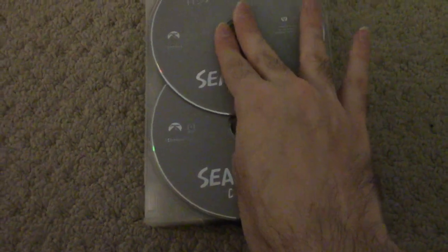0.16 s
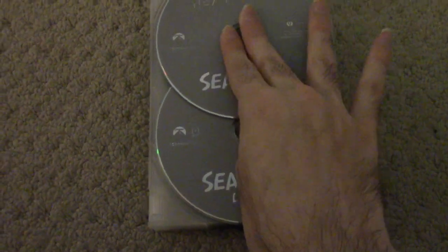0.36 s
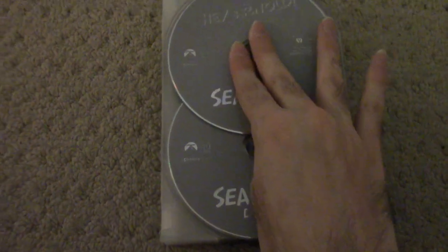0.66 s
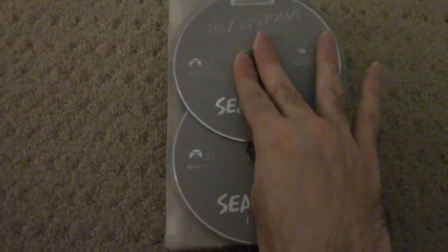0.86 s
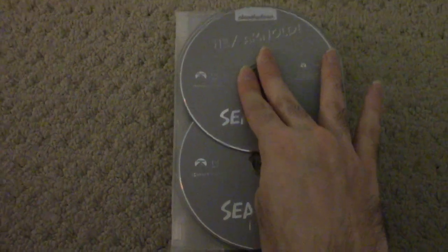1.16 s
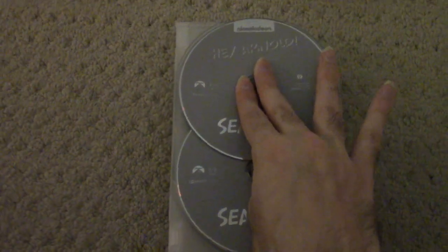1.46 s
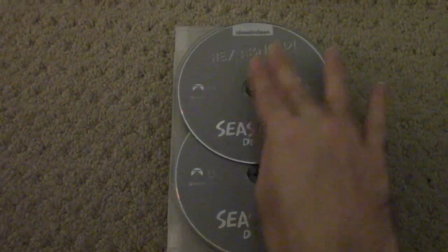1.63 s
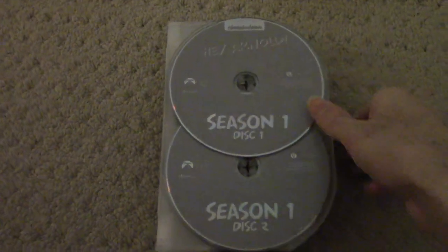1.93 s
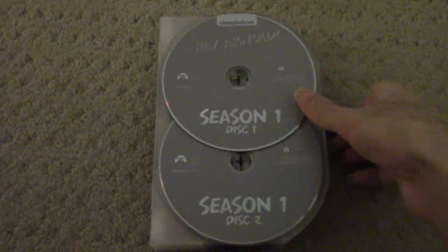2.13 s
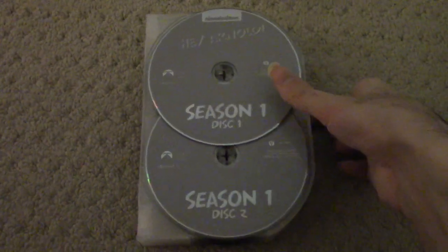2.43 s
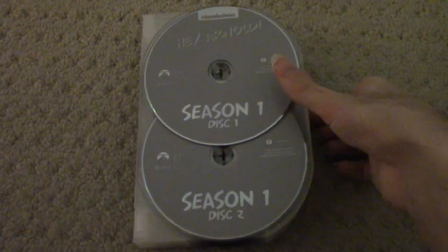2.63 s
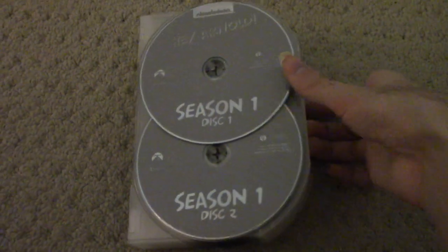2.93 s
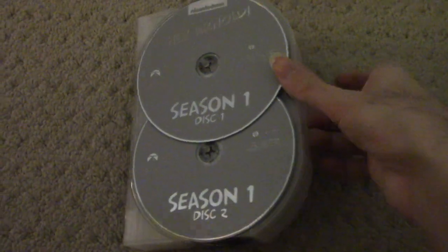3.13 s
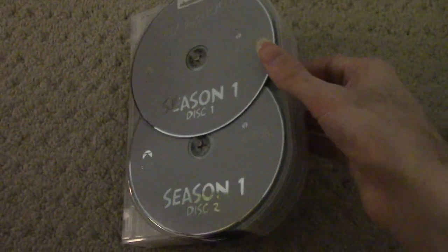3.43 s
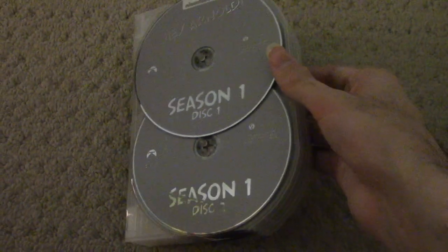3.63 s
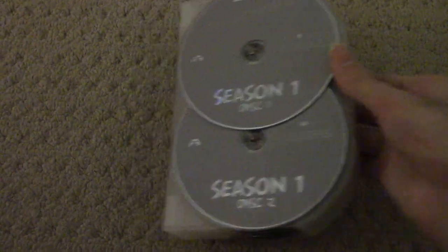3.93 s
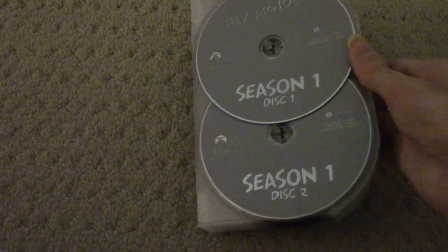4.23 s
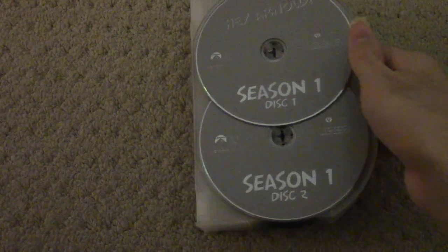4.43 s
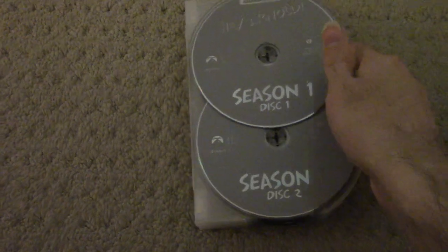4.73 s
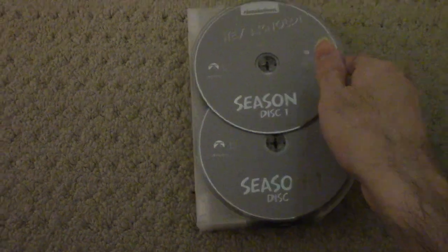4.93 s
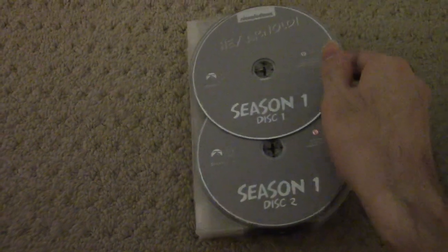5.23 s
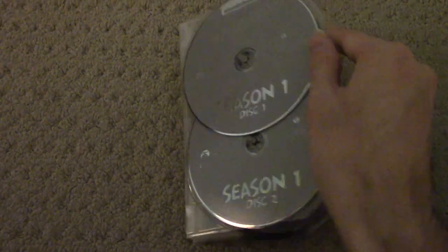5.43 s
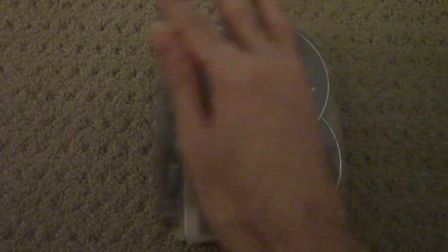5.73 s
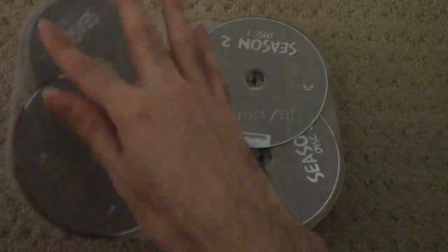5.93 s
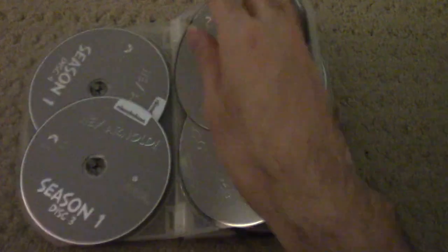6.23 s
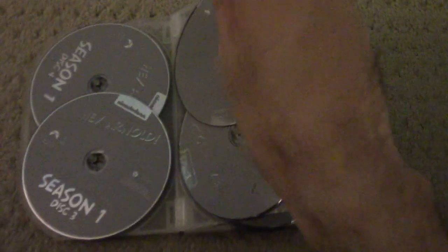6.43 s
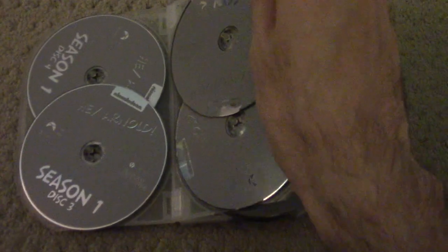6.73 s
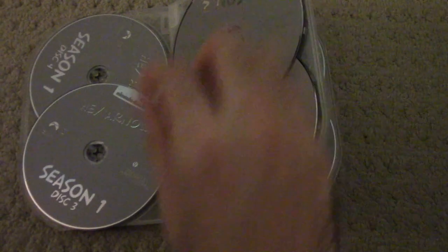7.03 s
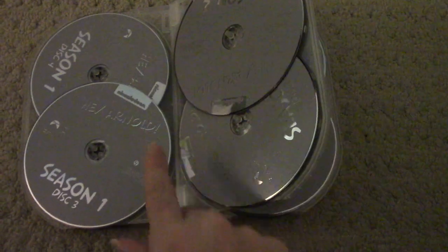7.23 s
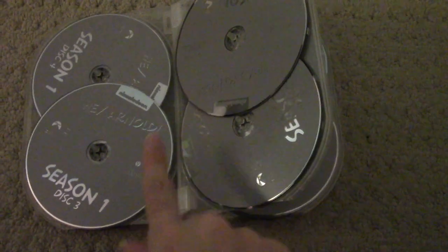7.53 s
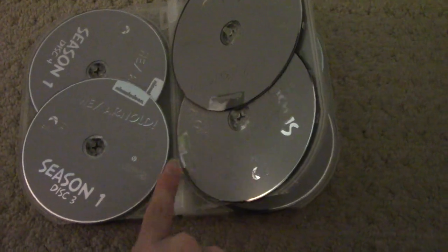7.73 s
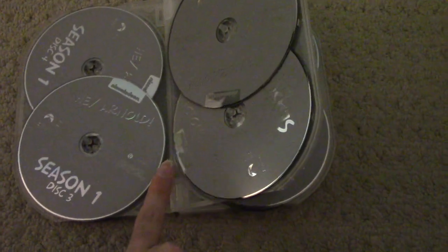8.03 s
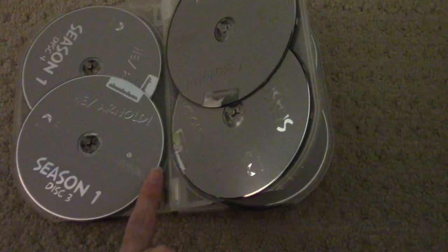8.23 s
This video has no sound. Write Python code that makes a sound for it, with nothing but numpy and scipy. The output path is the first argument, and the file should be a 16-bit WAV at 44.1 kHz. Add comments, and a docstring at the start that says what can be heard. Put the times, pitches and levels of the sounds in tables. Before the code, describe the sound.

Fingers pry at discs in a plastic case, with sharp clicks, a ripping catch and a rattling slap as the tray flips over.

```python
"""A plastic case full of discs is opened by hand on the carpet of a small, quiet room.
After a few clicks a disc snaps onto its hub. Fingers pry and tick along the rim, skin scuffs the
plastic, the case rocks and the hub creaks. The catch sticks, slips and rips free; then a loaded tray
swings over, slaps down and rattles, and a loose disc settles. Last comes the soft swish of an arm
drawing back, over low room tone with faint whines and chirps."""
import sys
import numpy as np
from scipy import signal
from scipy.fft import rfft, irfft, next_fast_len
from scipy.io import wavfile

SR = 44100
rng = np.random.default_rng(int(sys.argv[2]) if len(sys.argv) > 2 else 0)


def store_wav(level_fs):
    """Save 16-bit WAV to argv[1]."""
    pcm = np.round(np.clip(np.atleast_2d(level_fs), -1, 1) * 32767)
    wavfile.write(sys.argv[1], SR, pcm.T.astype(np.int16))


N = 369116
HANDLING_S = (1.2, 6.1)   # the hand works on the case: start, end
T_SHORT, T_LONG = np.arange(2600) / SR, np.arange(13000) / SR
EDGES_HZ = np.geomspace(62, 17000, 25)
CENTRES_HZ = np.sqrt(EDGES_HZ[1:] * EDGES_HZ[:-1])
BANK = [signal.butter(2, band, "band", fs=SR, output="sos") for band in zip(EDGES_HZ, EDGES_HZ[1:])]


def hub_snap():
    """The teeth of the hub jump through the hole of the disc, which cracks and rings."""
    # teeth jumping: t/s, level/dB
    teeth = [(1.2028, 6.5), (1.2041, 6.5), (1.2058, 3.5), (1.2082, -2)]
    # EQ of a contact on the disc: f/Hz, level/dB
    colour = [(70, -32), (140, -25), (220, -2), (300, -7), (560, 1), (1050, -3), (1400, -5), (2800, 2.5),
              (4000, 0), (5200, -6), (8300, 1), (9900, 0), (12000, -8.5), (15000, -21)]
    # disc resonances: f/Hz, width/Hz, level/dB
    modes = [(244.5, 45, -6), (398.5, 60, -7.5), (509.5, 40, -2.5), (663.5, 29, 1), (790, 55, -3),
             (940, 50, -4.5), (1057.3, 50, -2), (1568.5, 60, 2), (2026, 28, -2.5), (2347, 40, -4.5),
             (2793, 33, -1.5), (3030, 32, -3), (3400, 40, -4), (3822, 48, -3.5), (4100.8, 60, 3.5),
             (4460, 54, -4), (4939.2, 36, -7.5), (5460, 58, -6.5), (5780, 45, -8), (6200, 30, -6.5),
             (6540, 41, -2), (7920, 47, 0.5), (8050, 80, 1), (8760, 45, -4.5), (8900, 70, -1),
             (10200, 90, -6), (11030, 98, -13.5), (11470, 120, -10)]
    attack = struck(teeth, colour, crack_t60=.01, buzz_db=-12, buzz_t60=.11, rise_s=.00006)
    ring = ringing(teeth, modes, held_t60=.02, free_db=-9)
    return from_db(-1.47) * attack + from_db(-4) * ring


def catch_rip(release_s=4.7928, last_gap_s=.0026):
    """The catch sticks and slips, faster and harder until it lets go, then springs back once."""
    # EQ of a contact on the catch: f/Hz, level/dB
    colour = [(70, -35.5), (160, -10), (250, -3), (300, -7), (400, 0), (580, -10), (1100, 0), (1600, 1.5),
              (2800, 3), (5000, -3.5), (9500, -4), (12000, -16), (15000, -29.5)]
    # catch resonances: f/Hz, width/Hz, level/dB
    modes = [(246, 38, -8.5), (386.4, 60, -9), (1499, 51, 1), (1618.8, 60, -0.5), (1875.1, 70, 1),
             (2010, 80, 0), (2500, 60, -5), (2840, 55, -1), (2871.6, 60, -2), (3500, 70, -11),
             (3780, 70, -9), (7676.6, 100, -5)]
    ahead_s = np.append(0, np.cumsum(last_gap_s * 1.095 ** np.arange(9)))
    slip_db = -1 - 30 * (ahead_s / ahead_s[-1]) ** 2.15
    spring_back = (release_s + .033, -22)
    slips = [*zip(release_s - ahead_s, slip_db), spring_back]
    attack = struck(slips, colour, crack_t60=.015, buzz_db=-11, buzz_t60=.031, rise_s=.0007)
    ring = ringing(slips, modes, held_t60=.013, free_db=-12)
    return from_db(-2) * attack + from_db(-6.5) * ring


def tray_slap():
    """The loaded tray slaps down, buzzing and ringing as its discs rattle to rest."""
    # EQ of a contact on the tray: f/Hz, level/dB
    colour = [(70, -18), (130, -13), (300, 0), (520, -4.5), (700, 1.5), (1000, 1), (2000, -1), (3200, 0),
              (5000, -12.5), (7500, -2), (9700, -5.5), (11500, -18), (15000, -28)]
    # tray resonances: f/Hz, width/Hz, level/dB
    modes = [(428, 24, 3.5), (800, 10.5, 4), (940, 13, -9), (1300, 20, -4), (1417, 33, -2),
             (1507, 18, -7.5), (1815, 57.4, -1), (2166, 62.2, -5), (2530, 32.3, -8.5), (2800, 27, -8),
             (2940, 23.23, -3), (3160, 23.8, -4), (3595.7, 55, -6)]
    hits = tray_rattle() + disc_settling()
    attack = struck(hits, colour, crack_t60=.015, buzz_db=-3, buzz_t60=.025, rise_s=.00018)
    ring = ringing(hits, modes, held_t60=.02, free_db=2)
    return from_db(-1.5) * attack + from_db(-10) * ring


def tray_rattle(gap_s=.0046, drop_db=4.5, fade_db_per_s=330):
    """Each landing sets off a quick, uneven, fading rattle: t/s, level/dB."""
    # the tray and its discs land: t/s, level/dB, rattle length/s
    landings = [(6.1625, -16.5, .002), (6.1704, 0.5, .02), (6.195, -5.5, .038), (6.406, -27.5, .012),
                (6.4198, -18.5, .007), (6.474, -39, .018)]
    hits = []
    for s, db, length in landings:
        after = np.cumsum(gap_s * np.exp(.08 * rng.standard_normal(12)))
        hits.append((s, db))
        hits += [(s + t, db - drop_db - fade_db_per_s * t) for t in after[after < length]]
    return hits


def disc_settling(start_s=6.262, first_gap_s=.029, slowing=1.35, loss_db=3):
    """A loose disc rocks to rest, tapping the tray ever slower and softer: t/s, level/dB."""
    after = np.append(0, np.cumsum(first_gap_s * slowing ** np.arange(3)))
    return [(start_s + t, -26 - loss_db * k) for k, t in enumerate(after)]


def case_clicks(rim_hz=1780):
    """Nails and disc edges tick on the case; prying also rings its rim, which the grip damps."""
    # foreground clicks: t/s, level/dB, low shelf/dB, high shelf/dB
    clicks = [(0.2762, -19.5, -17, -10.5), (1.0748, -4, -1.5, -12), (1.1942, -16, 5.5, -15),
              (1.8687, -20.5, -1.5, -5.5), (1.9127, -21.5, 1, -9.5), (1.9418, -29, -10, -8),
              (2.044, -8.5, 8, -4), (2.4834, -26.5, 5.5, -12), (2.5025, -20, -4, -7),
              (2.6227, -11.5, 10, -8), (2.646, -25, 4, 2.5), (2.7466, -29.5, 8, -6),
              (2.7699, -11.5, -5, -11.5), (2.9518, -30, 4.5, -4), (3.0392, -23.5, 14.5, -8.5),
              (3.1972, -24.5, -19.5, -1.5), (3.246, -19, 3, -5), (3.2655, -14, -5, -7.5),
              (3.2863, -28, 1.5, -6), (3.669, -27, -6, -5), (3.7637, -20, -8, -18.5),
              (4.1992, -23, 5.5, -11), (5.206, -26, 5.5, -3), (5.9253, -22.5, 9, -10.5),
              (5.973, -29, 6, -10), (6.0856, -31, 10.5, -5.5), (8.062, -35, 5, -1.5)]
    # EQ of a click: f/Hz, level/dB
    colour = [(70, -20), (140, -0.5), (260, 2), (450, -4.5), (1000, 1), (1400, -6), (2500, 2), (4500, -1.5),
              (6000, 0.5), (9000, 3), (11500, -16), (15000, -17.5)]
    # rim ring relative to its click, freest while the thumb pries: t/s, level/dB
    rim_freedom = [(1.95, -17), (2.02, 3.5), (2.5, -3), (2.8, -4), (2.9, -15)]
    rim = unit(np.sin(2 * np.pi * rim_hz * T_SHORT) * dying(T_SHORT, t60=.011))
    out = np.zeros(N)
    for s, db, body_db, edge_db in clicks + hub_creaks() + faint_ticks():
        shelves = at_hz([(900, body_db), (2600, 0), (3400, .0019), (6500, edge_db)], CENTRES_HZ)
        add(out, s, plastic_crack(db + .97 + shelves + at_hz(colour, CENTRES_HZ)))
        rim_db = db + np.interp(s, *np.transpose(rim_freedom))
        add(out, s, from_db(rim_db) * rim)
    return out


def hub_creaks(gap_s=.004, fade_db_per_s=220):
    """The strained hub creaks in quick, uneven, fading slips, listed like the clicks."""
    # creaks: t/s, length/s, level/dB
    creaks = [(2.772, .012, -24.5), (3.241, .014, -25.5), (3.268, .024, -29.5)]
    slips = []
    for s, length, db in creaks:
        after = gap_s * (np.arange(7) + .5 * rng.random(7))
        slips += [(s + t, db - fade_db_per_s * t, -3, -3) for t in after[after < length]]
    return slips


def faint_ticks(per_s=3, spread_db=3.5):
    """Light chance touches of the working hand, listed like the clicks."""
    count = int(per_s * np.ptp(HANDLING_S))
    times = rng.uniform(*HANDLING_S, count)
    offsets_db = rng.uniform(-spread_db, spread_db, (count, 2))
    return [(s, -37 + db, body_db, -4.5) for s, (db, body_db) in zip(times, offsets_db)]


def case_thuds():
    """The case rocks on the carpet with low, dull thuds."""
    # thuds: t/s, level/dB
    thuds = [(1.915, -32), (2.052, -12.5), (2.626, -29.5), (6.178, -17)]
    # low resonances of the case: f/Hz, width/Hz, level/dB
    modes = [(122, 26.6, 1), (164.81, 31.16, 9), (216, 19, 8), (301, 30, -14)]
    return from_db(-6) * ringing(thuds, modes, held_t60=.035, free_db=-1)


def finger_rubs(grain_db=4.5, judder_db=3.5):
    """Skin sticks and slips in tiny uneven steps: a rasp in the shell and a hiss on its surface."""
    # finger strokes: middle t/s, length/s, rasp level/dB, hiss level/dB
    strokes = [(2.78, 0.081, -55.5, -70), (3.264, 0.031, -51, -70), (3.48, .018, -62.5, -69),
               (3.738, 0.059, -57, -81.5), (4.14, 0.059, -65, -87), (4.348, 0.036, -51.5, -53.5),
               (4.469, 0.071, -52.5, -63.5), (4.765, 0.036, -51, -67.5), (5.702, 0.086, -70, -68.5),
               (5.82, 0.036, -68, -60.5), (5.98, 0.053, -58.5, -69), (6.44, .15, -66.5, -85),
               (7.317, 0.13, -78, -70)]
    # EQ of the rasp: f/Hz, level/dB
    rasp_colour = [(400, -34), (650, -20), (820, 2.5), (1100, -10.5), (1400, -8), (1700, 5), (1900, -.5),
                   (2150, -2), (3000, -6.5), (4500, -13), (7000, -22), (15000, -39)]
    # EQ of the hiss: f/Hz, level/dB
    hiss_colour = [(2000, -1.5), (5000, -7), (9000, 3.5), (11500, -6), (15000, -19)]
    grit = rng.standard_normal(N) * from_db(grain_db * np.minimum(rng.exponential(1, N), 5))
    slips = grit * from_db(judder_db * noise_band(centre_hz=0, width_hz=150))
    creeping_grip = (np.mean(HANDLING_S), np.ptp(HANDLING_S) / 2, -74, -82)
    rasp = from_db(-4) * shaped(slips, lambda hz: at_hz(rasp_colour, hz))
    hiss = from_db(-4.5) * shaped(slips, lambda hz: at_hz(hiss_colour, hz))
    return sum(swell(s, length) * (from_db(rasp_db) * rasp + from_db(hiss_db) * hiss)
               for s, length, rasp_db, hiss_db in strokes + [creeping_grip])


def sleeve_swish():
    """A soft swish as the arm draws back."""
    # EQ of the sleeve: f/Hz, level/dB
    colour = [(800, -24), (2400, 4), (4000, 0), (7000, 2), (10000, -3), (15000, -16)]
    return from_db(-64) * swell(middle_s=7.06, length_s=.1486) * noise(colour)


def room(x, wet_db=-16.5, side_db=-20.5, build_s=.0076, t60=.14):
    """Reflections of a small carpeted room build up after the direct sound and die quickly."""
    envelope = dying(T_LONG, t60) * (1 - np.exp(-(T_LONG / build_s) ** 2))
    damping = signal.butter(1, 10970, fs=SR, output="sos")
    tails = signal.sosfilt(damping, rng.standard_normal((2, len(T_LONG))) * envelope)
    mid, side = (signal.fftconvolve(x, unit(tail))[:N] for tail in tails)
    return x + from_db(wet_db) * (mid + from_db(side_db) * side * [[1], [-1]])


def room_tone():
    """A low rush with faint whines and chirps, nearly the same at both ears."""
    # EQ of the rush: f/Hz, level/dB
    colour = [(20, -31), (40, -24.5), (75, -13.5), (120, -5), (170, -3), (240, -4), (433, -10.5),
              (700, -13.5), (1020, -18), (1500, -19), (2000, -22), (4870, -27.5), (9500, -34), (15000, -42)]
    # narrow noise bands that whine: f/Hz, width/Hz, level/dB
    whines = [(170, 17, -74), (248.56, 25, -73), (1575, 45, -82)]
    # extra EQ on the side channel: f/Hz, level/dB
    side_colour = [(30, -6.5), (80, -18), (180, -20.5), (400, -12.5), (1000, -9), (4000, -20), (15000, -30)]
    mid = from_db(-61.5) * noise(colour) + faint_chirps()
    for hz, width, db in whines:
        mid += from_db(db) * noise_band(hz, width)
    side = shaped(rng.standard_normal(N), lambda hz: at_hz(colour, hz) + at_hz(side_colour, hz))
    return mid + from_db(-71) * side * [[1], [-1]]


def faint_chirps(pitch_hz=2155, rise_s=.0031, gap_s=.04, spread_db=3.5):
    """Tiny blips run on in the background, uneven in timing, level and pitch."""
    envelope = T_SHORT / rise_s * np.exp(-T_SHORT / rise_s)
    out, s = np.zeros(N), 0
    for wait, size, detune in rng.standard_normal((400, 3)):
        s += gap_s * np.exp(.35 * wait)
        if s * SR < N - 1:
            blip = envelope * np.sin(2 * np.pi * pitch_hz * (1 + .013 * detune) * T_SHORT)
            add(out, s, from_db(-60.5 + spread_db * min(size, 1.5)) * blip)
    return out


def struck(hits, colour, crack_t60, buzz_db, buzz_t60, rise_s):
    """Every hit cracks, longer in the bass, after which the loose parts buzz against each other."""
    t, out = span(hits), np.zeros(N)
    buzz = from_db(buzz_db) * stored(hits, t, buzz_t60)
    lag = np.exp(-1 / (rise_s * SR))   # a sliding contact builds up its force gradually
    gains = unit(from_db(at_hz(colour, CENTRES_HZ)) * np.sqrt(np.diff(EDGES_HZ)))
    for gain, sos, hz in zip(gains, BANK, CENTRES_HZ):
        crack = stored(hits, t, crack_t60 * (1 + 500 / hz))
        envelope = signal.lfilter([1 - lag], [1, -lag], np.hypot(crack, buzz))
        band = unit(signal.sosfilt(sos, envelope * rng.standard_normal(len(t))))
        add(out, t[0], gain * np.linalg.norm(envelope) * band)
    return out


def ringing(hits, modes, held_t60, free_db):
    """Each mode has a damped decay while the parts touch, and a free ring set by its width."""
    t, out = span(hits), np.zeros(N)
    held = stored(hits, t, held_t60)
    gains = unit(from_db(np.array(modes)[:, 2]))
    for (hz, width, _), gain in zip(modes, gains):
        free = stored(hits, t, t60=np.log(1000) / (np.pi * width))
        envelope = np.hypot(held, from_db(free_db) * free)
        add(out, t[0], np.sqrt(2) * gain * envelope * np.sin(2 * np.pi * (hz * t + rng.random())))
    return out


def plastic_crack(band_db, treble_t60=.018):
    """The crowded, heavily damped modes of thin plastic, lasting longer in the bass."""
    gains = from_db(band_db) * np.sqrt(np.diff(EDGES_HZ) / (SR / 2))
    out = np.zeros(len(T_SHORT))
    for gain, sos, hz in zip(gains, BANK, CENTRES_HZ):
        burst = rng.standard_normal(len(T_SHORT)) * dying(T_SHORT, treble_t60 * (1 + 600 / hz))
        out += gain * unit(signal.sosfilt(sos, burst))
    return out


def stored(hits, t, t60):
    """Envelope of a part whose energy is topped up by every hit and drains away in between."""
    fed = np.zeros(len(t))
    for s, db in hits:
        fed[int(round((s - t[0]) * SR))] += from_db(db) ** 2
    retained = dying(1 / SR, t60) ** 2
    return np.sqrt(signal.lfilter([1 - retained], [1, -retained], fed + 1e-24))


def span(hits):
    """Sample times from the first hit until the last has died away."""
    times = np.array(hits)[:, 0]
    return np.arange(int(times.min() * SR) - 1, int(times.max() * SR) + len(T_LONG)) / SR


def noise(colour):
    """Steady noise through an EQ curve; rms 1."""
    return shaped(rng.standard_normal(N), lambda hz: at_hz(colour, hz))


def noise_band(centre_hz, width_hz):
    """Noise that is 6 dB down one width from its centre; rms 1."""
    return shaped(rng.standard_normal(N), lambda hz: -20 * np.log10(1 + ((hz - centre_hz) / width_hz) ** 2))


def shaped(x, gain_db):
    """Equalise by a dB rule of frequency; rms 1."""
    size = next_fast_len(N)
    hz = np.arange(size // 2 + 1) * SR / size
    spectrum = rfft(x, size) * from_db(gain_db(hz))
    return unit(irfft(spectrum, size)[:N]) * np.sqrt(N)


def at_hz(colour, hz):
    """Read an EQ curve on a log-frequency axis."""
    f, db = np.transpose(colour)
    return np.interp(np.log(np.maximum(hz, 1)), np.log(f), db)


def swell(middle_s, length_s):
    """A bell-shaped fade in and out."""
    return np.exp(-2 * np.minimum(((np.arange(N) / SR - middle_s) / length_s) ** 2, 20))


def dying(t, t60):
    """Free decay, 60 dB down after t60 seconds."""
    return from_db(-60 * t / t60)


def add(track, s, sound):
    """Lay a sound into the track at a time."""
    i = int(round(s * SR))
    track[i:i + len(sound)] += sound[:N - i]


def unit(x):
    """Scale to an energy of one."""
    return x / np.sqrt(np.sum(x ** 2) + 1e-20)


def from_db(db):
    """Decibels to gain."""
    return 10 ** (np.asarray(db) / 20)


def scene():
    """The handling sounds in the room, a touch left of centre, over the room tone."""
    parts = hub_snap() + catch_rip() + tray_slap()
    parts += case_clicks() + case_thuds() + finger_rubs() + sleeve_swish()
    # the handling sounds carry no deep bass
    parts = signal.sosfilt(signal.butter(4, 125, "high", fs=SR, output="sos"), parts)
    # the sound reaches the left side a fraction of a sample earlier
    lead = .12 * np.gradient(parts) * [[1], [-1]]
    pan = from_db([[.15], [-.15]])
    return (room(parts) + lead) * pan + room_tone()


def record(dry):
    """A steep high cut at 15.9 kHz."""
    return signal.sosfilt(signal.ellip(10, .1, 80, 15900, fs=SR, output="sos"), dry)


dry = scene()
out = record(dry)
store_wav(out)
```